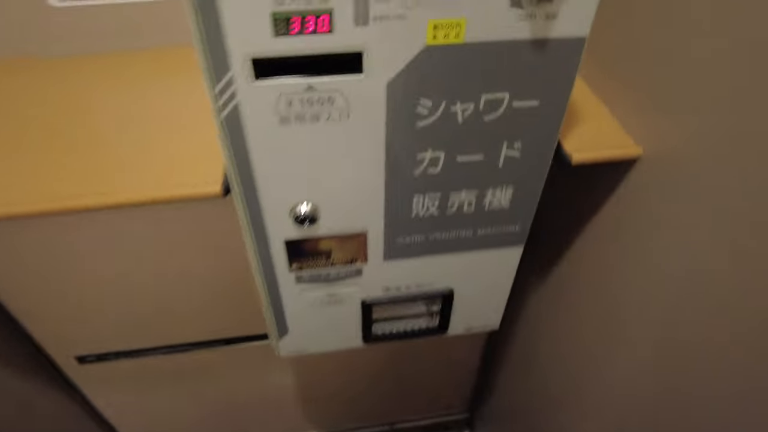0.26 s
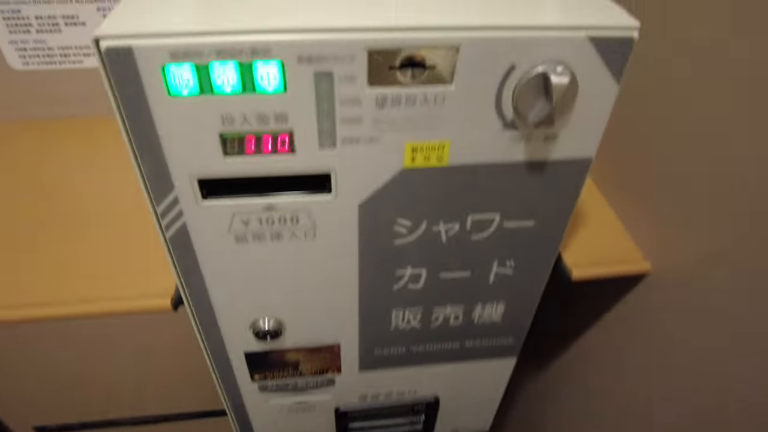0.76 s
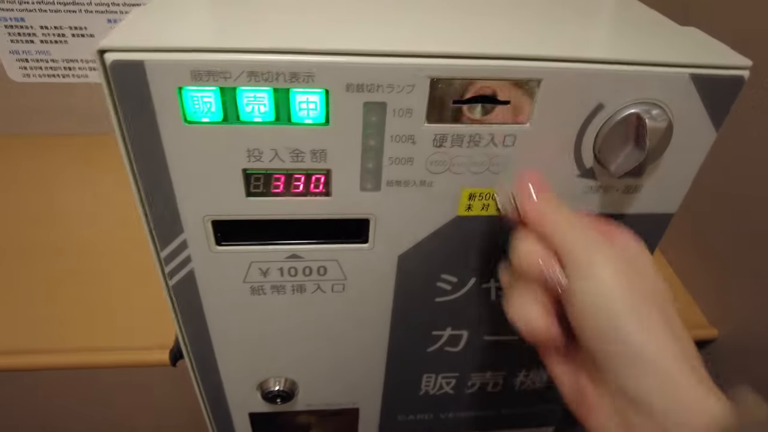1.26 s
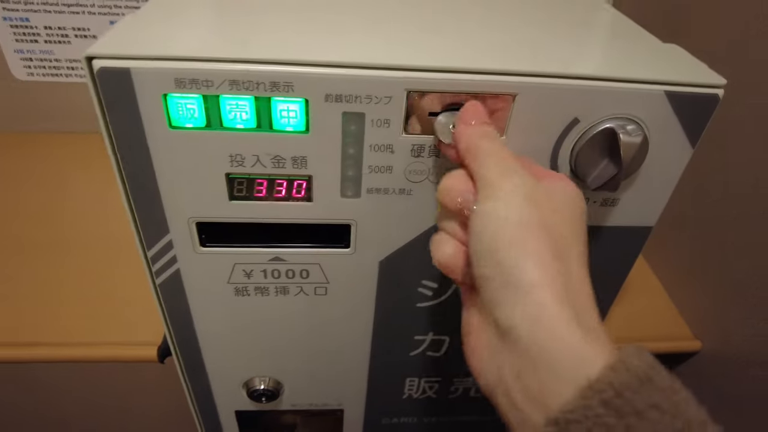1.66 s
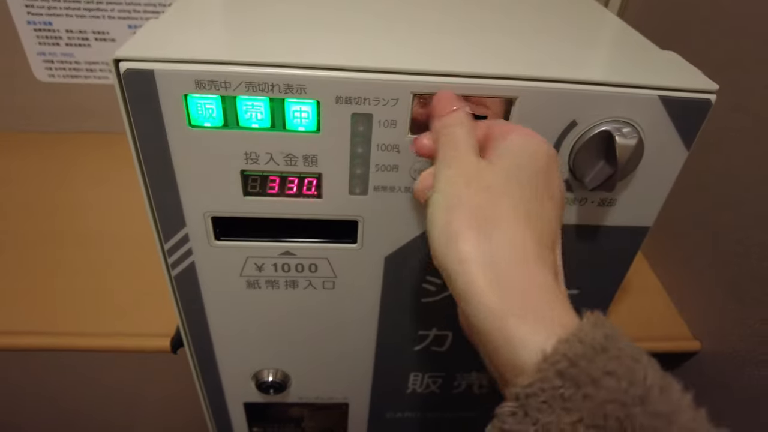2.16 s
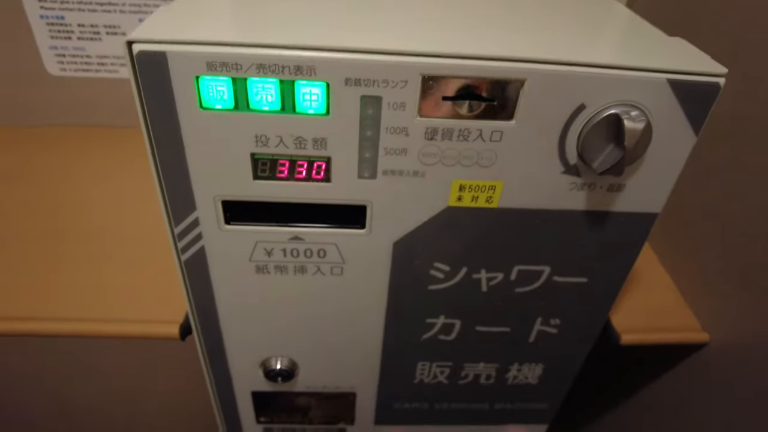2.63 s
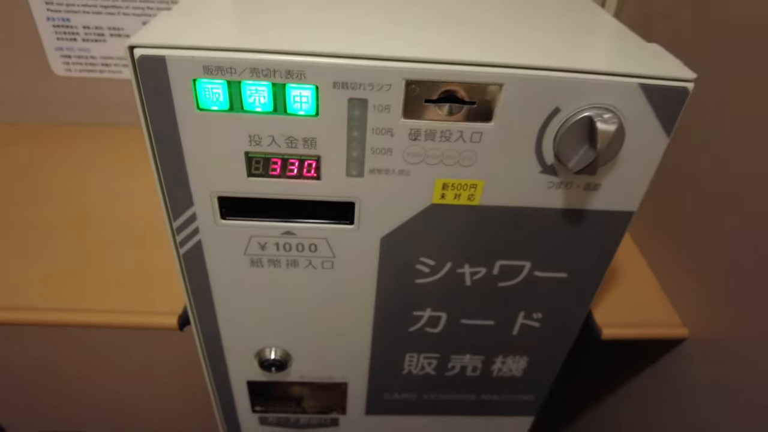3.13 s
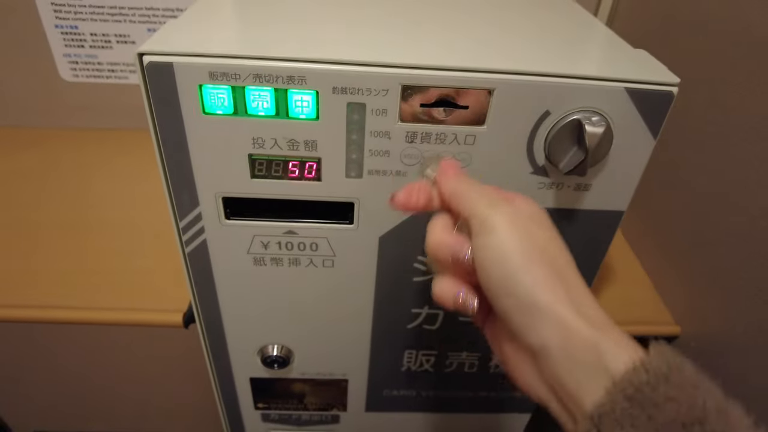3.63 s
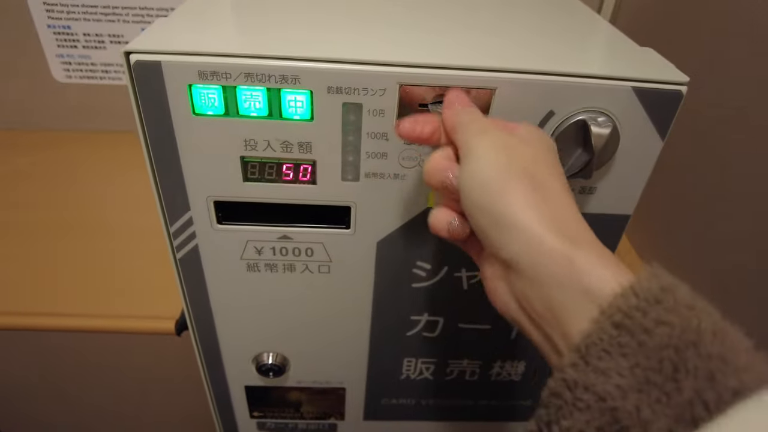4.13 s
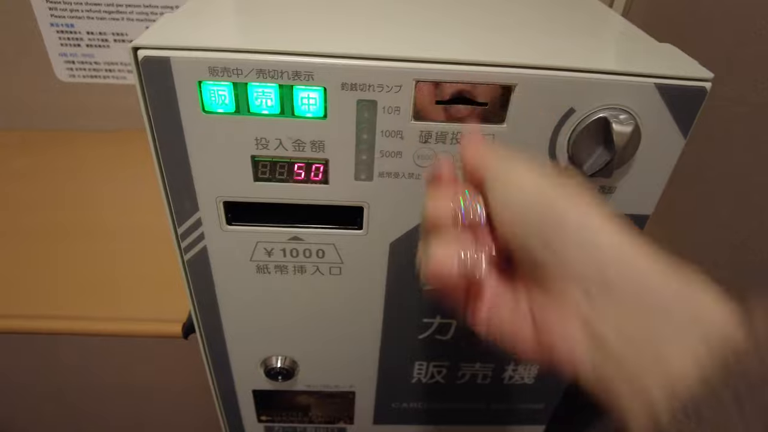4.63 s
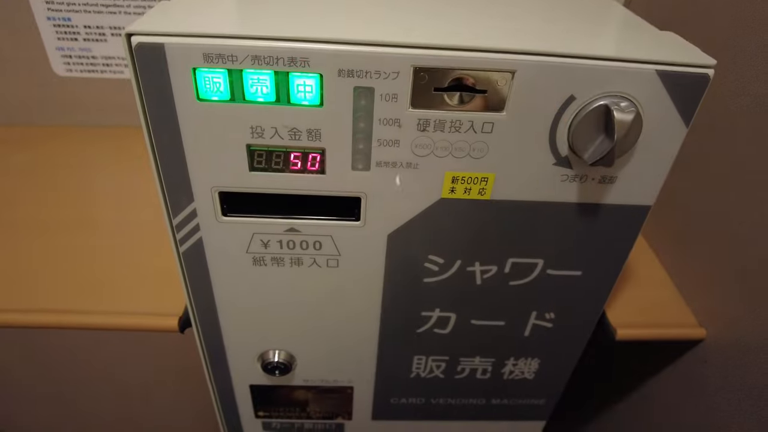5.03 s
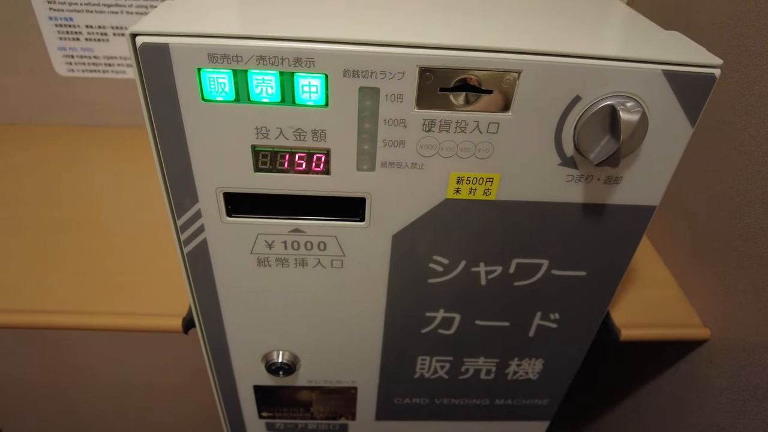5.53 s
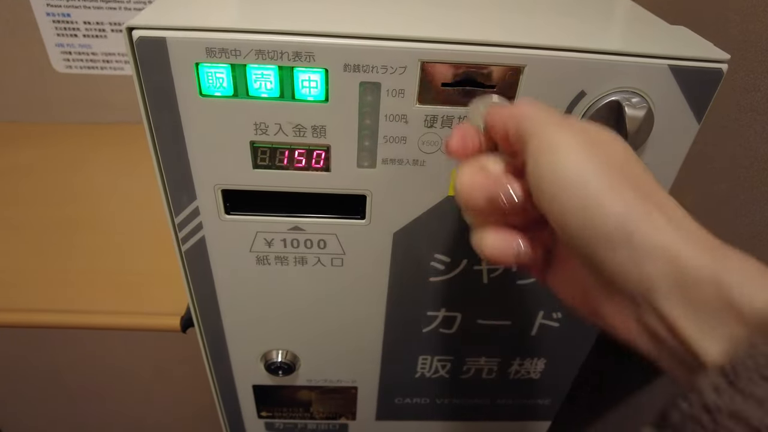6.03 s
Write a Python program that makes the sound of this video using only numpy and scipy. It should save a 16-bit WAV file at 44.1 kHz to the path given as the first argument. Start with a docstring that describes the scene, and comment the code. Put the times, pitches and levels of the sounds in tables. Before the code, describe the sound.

Inside a moving train, a deep rumble with soft roar and faint hiss runs throughout, with dull knocks early on. Close to the microphone, a coin taps a slot, clinks down a steel chute and tumbles away in rattles. A second coin follows the same way, then fabric rustles and a last light tap ends it.

```python
"""Two coins are fed into a card machine in the corridor of a moving train, close to the microphone.
They tap the slot, strike a steel chute and tumble: noise bursts with clanks and decaying metal modes.
Under them the carriage rumbles, roars and hisses as shaped noise and knocks with low dying tones.
Late on a sleeve rustles in grainy noise strokes; a short corridor tail follows the coins."""
import sys
import numpy as np
from scipy import signal
from scipy.fft import rfft, irfft
from scipy.io import wavfile
from scipy.ndimage import uniform_filter1d

SR = 44100
rng = np.random.default_rng(int(sys.argv[2]) if len(sys.argv) > 2 else 0)


def inscribe(sig):
    """Save sig as 16-bit PCM at rate SR to the path in sys.argv[1].

    A 1-D sig is mono; a 2-D sig holds one channel per row.
    Samples are clipped to [-1, 1] before scaling.
    """
    pcm = np.round(np.clip(np.atleast_2d(sig).T, -1, 1) * 32767)
    wavfile.write(sys.argv[1], SR, pcm.astype(np.int16))


N = 277389  # samples


def amp(db):
    """Amplitude factor of a level in dB."""
    return 10 ** (np.asarray(db) / 20)


def evened(x):
    """Scales to unit RMS."""
    return x / np.sqrt(np.mean(x ** 2) + 1e-20)


def read(points, hz):
    """Reads a (hz, value) curve, straight on a log-frequency axis."""
    point_hz, value = np.transpose(points)
    return np.interp(np.log(hz + 1), np.log(point_hz + 1), value)


def add(mix, start_s, sound):
    """Adds a sound at its start time, cut at the end of the mix."""
    part = mix[:, round(start_s * SR):][:, :sound.shape[-1]]
    part += sound[..., :part.shape[-1]]


def coloured(x, points):
    """Shapes sound by a (hz, gain_db) spectrum."""
    n = x.shape[-1]
    return irfft(rfft(x) * amp(read(points, np.fft.rfftfreq(n, 1 / SR))), n)


def ring(hz, t60_s, rise_s=0.00017):
    """One mode: an exponentially dying sine with a soft start."""
    t = np.arange(SR // 2) / SR
    decay = amp(-60 * t / max(t60_s, .01))
    rise = -np.expm1(-t / max(rise_s, 1e-4))
    return decay * rise * np.sin(2 * np.pi * hz * t)


# panel resonances: pitch_hz, width_hz, boost_db (mean)
PANEL_MODES = [(165.8, 12, 6.5), (322, 48, 5), (390.3, 25.7, 7), (494, 10.5, 7.5), (780, 13.3, 8),
               (1342, 69, 6.5), (2570, 75, 7.5), (4370, 230, 9)]
# left-right likeness: pitch_hz, correlation (0..1)
LIKENESS = [(30, 0.99), (80, 0.98), (180, 0.98), (500, 0.33), (1300, 0.37), (4000, 0.1), (15000, 0.067)]
# stereo balance: pitch_hz, left_minus_right_db
BALANCE = [(30, -2.5), (70, -0.1), (200, 0), (550, 3), (1600, 1.5), (5000, 0.5), (14000, 1)]


def wash(spectrum, patchy_db, size):
    """Stereo noise from random short-time spectra, with drifting patches and panel resonances."""
    hop = size // 4
    hz = np.fft.rfftfreq(size, 1 / SR)
    frames = N // hop + 6
    a, b, c, d, patches = rng.standard_normal((frames, len(hz), 5)).T
    patches = uniform_filter1d(patches, size=6, axis=0)  # over frequency
    patches = evened(uniform_filter1d(patches, size=8, axis=1))  # over time
    # each panel comes and goes
    shake = rng.standard_normal((frames, len(PANEL_MODES)))
    shake = uniform_filter1d(shake, size=SR // 4 // hop, axis=0).T
    panels_db = 0
    for (panel_hz, width_hz, boost_db), drift in zip(PANEL_MODES, shake):
        bump_db = boost_db / (1 + (2 * (hz - panel_hz) / width_hz) ** 2)
        panels_db = panels_db + np.outer(bump_db, 1 + .5 * evened(drift))
    same = np.clip(read(LIKENESS, hz), -1, 1)[:, None]
    left = a + 1j * b
    right = same * left + np.sqrt(1 - same ** 2) * (c + 1j * d)
    lean_db = np.array([.5, -.5])[:, None] * read(BALANCE, hz)
    level_db = (read(spectrum, hz) + lean_db)[..., None] + panels_db + patchy_db * patches
    spectra = np.array([left, right]) * amp(level_db)
    return evened(signal.istft(spectra, nperseg=size, noverlap=size - hop)[1][:, :N])


# running noise: time_s, rumble_db, roar_db, hiss_db
RIDE_LEVELS = [(0.0, -31, -44.5, -58.5), (2.0, -25.5, -43, -59), (2.38, -27, -44, -55),
               (4.08, -27.5, -44, -58.5), (5.57, -27, -43.5, -52.5), (6.29, -28.5, -44.5, -58)]
# body rumble: pitch_hz, density_db_per_hz (relative)
RUMBLE_SPECTRUM = [(12, -9.5), (22, 2), (36, 5), (50, 2), (88, -0.5), (118, -4.5), (146, -31), (178, -20.5),
                   (220, -24), (290, -39), (480, -120)]
# wheel roar: pitch_hz, density_db_per_hz (relative)
ROAR_SPECTRUM = [(76, -67), (130, -5), (252, -9.5), (495, -13.5), (584, -19), (776, -18), (995, -34),
                 (1320, -29), (2200, -34.5), (2860, -97)]
# air hiss: pitch_hz, density_db_per_hz (relative)
HISS_SPECTRUM = [(710, -19), (1200, -7.5), (2340, -17.5), (2780, -14), (4200, -22.5), (15500, -33.5),
                 (16400, -41)]
# dull carriage knocks: start_s, level_db, pitch_hz, t60_s
KNOCKS = [(0.391, -21, 202, 0.073), (0.528, -17.5, 180.2, 0.24), (1.11, -12.5, 223, 0.041),
          (1.505, -32, 151, 0.054), (1.943, -28.5, 182.6, 0.25), (2.298, -26, 317, 0.077),
          (5.582, -27.5, 685, 0.08), (5.82, -22.5, 267, 0.06)]


def carriage():
    """Rumble, roar and hiss, each swelling with the ride, and knocks as low dying modes."""
    time_s, *levels = np.transpose(RIDE_LEVELS)
    t = np.arange(N) / SR
    rumble, roar, hiss = (amp(np.interp(t, time_s, level_db)) for level_db in levels)
    out = rumble * wash(RUMBLE_SPECTRUM, 1.0, size=8192)
    out += roar * wash(ROAR_SPECTRUM, 1.0, size=4096)
    out += hiss * wash(HISS_SPECTRUM, 1.0, size=1024)
    for start_s, level_db, pitch_hz, t60_s in KNOCKS:
        add(out, start_s, amp(level_db) * ring(pitch_hz, t60_s, 0.0073)[None])
    return out


ENDS_DB, BODY_SHARE = -8.5, 0.47  # body and treble sit below the middle; brightness trades them
CLANK_PER_BRIGHT = -0.2  # dB per dB: dull blows clank harder
CLANK_FALL_DB = 165  # per decay_s
# sheet-metal modes: pitch_hz, level_db (relative), t60_s
CABINET_MODES = [(1200, -10, .04), (1900, -4, .06), (2795, -6, .07), (3700, -12, .05), (4370, -7, .05),
                 (4730, -10, .05), (5700, -11, .04), (6750, 3, .035), (7800, -9, .04)]


def tap(level_db, bright_db, clank_hz, decay_s, ring_db,
        clank_db, half_width_share, note, rise_s, uneven_db):
    """A noise rattle, the cabinet's modes and one clank; slow rise and uneven level make a tumble."""
    t = np.arange(SR // 4) / SR
    hz = np.fft.rfftfreq(len(t), 1 / SR)
    shared, wobble, *own = rng.standard_normal((4, len(t)))
    low_db = ENDS_DB - BODY_SHARE * bright_db
    high_db = ENDS_DB + (1 - BODY_SHARE) * bright_db
    colour = [(400, low_db + 0.5), (900, low_db), (2000, low_db), (3500, -5.0),
              (7000, -2.5 + 0.45 * high_db), (10000, high_db), (16000, high_db - 1.5)]

    # many small parts ring unevenly; the rattle keeps feeding the modes
    lumps_db = 1.5 * evened(uniform_filter1d(rng.standard_normal(len(hz)), size=110))
    peaks = sum(amp(ring_db + mode_db - 4) / (1 + ((hz - mode_hz) / (0.029 * mode_hz)) ** 2)
                for mode_hz, mode_db, _ in CABINET_MODES)
    body_db = 20 * np.log10(1 + peaks)
    source = 0.4 * shared + 1.28 * np.array(own)
    rattle = evened(irfft(rfft(source) * amp(read(colour, hz) + lumps_db + body_db), len(t)))
    u = t / max(decay_s, .01)
    fall = amp(-30 * u - 14 * u ** 2) + np.exp(-t / 0.0024)  # slow-then-steep fall plus a sharp onset
    fall *= amp(uneven_db * evened(uniform_filter1d(wobble, size=70)))

    # one clean contact leaves a note in the noise
    band = 1 / (1 + ((hz - clank_hz) / (half_width_share * clank_hz)) ** 2)
    clank = evened(irfft(rfft(shared) * band, len(t)))
    clank = 0.7 * (clank + note * np.sin(2 * np.pi * clank_hz * t))
    clank_gain = amp(clank_db + CLANK_PER_BRIGHT * bright_db - CLANK_FALL_DB * u)

    # each hit wakes the modes differently; loose panels make them rough
    spots_db = rng.normal(0, 2, (len(CABINET_MODES), 2, 1))
    chatter = uniform_filter1d(rng.standard_normal((len(CABINET_MODES), 2, len(t))), size=200)
    modes = np.zeros((2, len(t)))
    for (mode_hz, mode_db, t60_s), spot_db, rough in zip(CABINET_MODES, spots_db, chatter):
        gain = amp(mode_db + read(colour, mode_hz) + spot_db) * (1 + .5 * evened(rough))
        modes += gain * ring(mode_hz, t60_s)[:len(t)]

    sound = rattle * fall + clank_gain * clank + amp(ring_db) * modes
    return amp(level_db) * sound * -np.expm1(-t / max(rise_s, 1e-4))


# settings: clank_db, half_width_share (of clank_hz), note (strength), rise_s, uneven_db
TAP_SETTINGS = (1, 0.06, 1.1, 0.00054, 1)
TUMBLE_SETTINGS = (4.5, 0.05, 0.4, 0.0049, 3)
TUMBLE_RING_DB = -35
# slot and chute contacts: start_s, level_db, bright_db (treble minus body), clank_hz, decay_s, ring_db
CONTACTS = [(0.296, -39.5, -17.5, 850, 0.048, -10), (0.346, -62, 7, 11000, 0.077, -9),
            (0.3998, -57, -21, 3050, 0.27, -21), (0.949, -48, -27, 1340, 0.053, -18),
            (1.3917, -34, -26, 1130, 0.03, -16), (1.409, -59, -52, 1880, 0.2, -10),
            (1.6575, -39.5, 7, 2550, 0.033, 2), (1.71, -57, -17, 2670, 0.095, -5),
            (1.771, -60, -17, 6900, 0.093, -9), (2.017, -49.5, -2, 5100, 0.12, -6),
            (2.095, -51.5, -2, 6800, 0.1, 5), (2.177, -47, 15, 11200, 0.099, -10),
            (2.278, -48.5, -17, 6940, 0.038, -8), (2.3218, -42.5, 5, 8500, 0.07, -21),
            (2.4686, -38.5, -13, 2520, 0.033, -9), (2.487, -43, 2, 3900, 0.04, -10),
            (2.541, -36.5, -5, 6400, 0.043, -15), (2.587, -52, -3, 4560, 0.21, -8),
            (2.6279, -35.5, 9, 4760, 0.035, -14), (2.929, -43, 7, 5650, 0.018, -17),
            (3.014, -53, -14, 4300, 0.049, -12), (3.067, -44, -4, 4100, 0.037, -16),
            (3.9801, -38, 4, 1960, 0.077, 6), (4.0043, -46.5, -10, 1970, 0.066, 10.5),
            (4.1136, -47.5, -6, 1960, 0.058, 9), (4.297, -54, 7, 9000, 0.046, -2),
            (4.3106, -46.5, 10, 4440, 0.041, -12), (4.358, -52.5, 13, 12100, 0.039, -10),
            (4.464, -39.5, 0.5, 8500, 0.1, -5), (4.4962, -44, -1, 6770, 0.15, -17),
            (4.567, -47, -12, 3930, 0.059, -14), (4.678, -43.5, -16, 2490, 0.071, -15),
            (4.6966, -39.5, 1, 4260, 0.047, -6.5), (4.8017, -38.5, 9, 4800, 0.04, -7),
            (4.967, -50.5, -3, 5540, 0.054, -3), (5.1033, -45.5, -22, 4120, 0.08, -10),
            (5.111, -48.5, -9, 1936, 0.22, -14), (5.414, -49.5, -29, 1170, 0.16, -11),
            (5.475, -40, -15, 4400, 0.1, -25), (5.489, -36.5, -3, 1160, 0.024, -18),
            (5.771, -46, -33, 750, 0.068, -19), (6.2397, -42.5, -4, 1870, 0.069, -26)]
# sliding, tumbling coin, soft-starting rattles: start_s, level_db, bright_db, clank_hz, decay_s
TUMBLE_RATTLES = [(0.7526, -46.5, -5, 14200, 0.11), (2.344, -43, 1, 3980, 0.097),
                  (2.7286, -47.5, 10, 7300, 0.19), (2.946, -42, 2, 5540, 0.16),
                  (2.9802, -42.5, -11.5, 4400, 0.19), (3.052, -47, -5, 4200, 0.19),
                  (3.108, -42.5, -13.5, 4300, 0.16), (3.124, -44, -49, 980, 0.082),
                  (3.1998, -50, -6, 7250, 0.24), (3.2385, -51, -23, 4000, 0.17),
                  (3.419, -45.5, -15.5, 11700, 0.15), (3.4528, -40.5, -4, 4200, 0.06),
                  (4.757, -42.5, -9, 4180, 0.13), (5.011, -61, -6, 5600, 0.57),
                  (5.054, -39.5, -2.5, 4230, 0.098), (5.071, -38.5, 4, 4230, 0.043),
                  (5.1482, -39.5, -5, 4380, 0.095), (5.167, -46, -39, 1100, 0.087)]


def coins():
    """Coins on metal: sharp contacts, and slower, softer-starting rattles with uneven level."""
    out = np.zeros((2, N))
    for start_s, *blow in CONTACTS:
        add(out, start_s, tap(*blow, *TAP_SETTINGS))
    for start_s, *rattle in TUMBLE_RATTLES:
        add(out, start_s, tap(*rattle, TUMBLE_RING_DB, *TUMBLE_SETTINGS))
    return out


def corridor(x):
    """A short, narrow space: a decaying tail, different at each ear, duller as it dies."""
    t = np.arange(SR // 2) / SR
    noise = rng.standard_normal((2, len(t))) * (t > .004)
    dull = signal.lfilter([.4], [1, -.6], noise)
    tail = noise * amp(-60 * t / 0.038) + dull * amp(-11.5 - 60 * t / 0.4)
    return signal.fftconvolve(x, tail / np.linalg.norm(tail[0]), axes=1)[:, :N]


def flutter(depth_db):
    """Random gain wavering, mostly deep dips with slight rises, as the rolling coin chokes the rings."""
    drift = uniform_filter1d(rng.standard_normal(N), size=220)
    drift = evened(uniform_filter1d(drift, size=220))
    return amp(depth_db * (1 - drift ** 2) / 2)


# steel plate modes: pitch_hz (first row replaced by low_hz), level_db (relative), t60_s
CHUTE_MODES = [(3022, 0, .2), (3183, -8, .12), (3940, -9, .08), (4825, -3, .04), (4865, -17, .36),
               (9420, -6, .05)]
# blows on the chute: start_s, level_db, low_hz, pair_db (extra, near 4.8 kHz), top_db (extra, top mode)
BLOWS = [(2.3224, -37.5, 2998, -4, 9.5), (2.341, -45, 2998, 4, -12), (2.3575, -40, 2998, 8, -1),
         (2.383, -48, 2998, 7, -10), (2.412, -52, 2998, 11, -10), (4.465, -39, 3025, 2, -6),
         (4.566, -50, 3025, 12, -6)]
# coin ringing in the air: start_s, level_db, pitch_hz
COIN_RINGS = [(2.2797, -58, 11600), (2.5421, -46, 11600), (4.4662, -44, 10500), (4.7331, -52, 11000)]


def rings():
    """Chute modes, each wavering on its own, and the coin; each coin loads the lowest mode differently."""
    plate, coin = np.zeros((len(CHUTE_MODES), N)), np.zeros((1, N))
    for start_s, level_db, low_hz, pair_db, top_db in BLOWS:
        modes = [(low_hz, *CHUTE_MODES[0][1:]), *CHUTE_MODES[1:]]
        blow = []
        for hz, mode_db, t60_s in modes:
            extra_db = pair_db * (4500 < hz < 5200) + top_db * (hz > 8000)
            blow.append(amp(level_db + mode_db + extra_db) * ring(hz, t60_s, 0.00035))
        add(plate, start_s, np.array(blow))
    for start_s, level_db, pitch_hz in COIN_RINGS:
        add(coin, start_s, amp(level_db) * ring(pitch_hz, 0.13)[None])
    return sum(mode * flutter(6.5) for mode in plate) + coin * flutter(6)


RUB_TREBLE_DB, RUB_TREBLE_DB_PER_S = -14.5, 17.5  # longer strokes swish brighter
# sleeve strokes: start_s, level_db, length_s
STROKES = [(5.28, -45, 0.16), (5.389, -43.5, 0.09), (5.561, -38, 0.2), (5.649, -38.5, 0.11),
           (5.816, -35, 0.14), (5.899, -50.5, 0.33)]


def sleeve():
    """Fleece rubbing near the microphone: grainy strokes with a dull body and a bright edge."""
    body_colour = [(120, -5), (280, 7.0), (480, 6.0), (700, 1.0), (1300, -3), (3000, -16.5), (5000, -75)]
    edge_colour = [(2000, -42), (3500, 2.0), (8000, -3), (16000, -7.0)]
    out = np.zeros((2, N))
    for start_s, level_db, length_s in STROKES:
        u = np.arange(SR // 2) / SR / max(length_s, .02)
        left, right, grip = rng.standard_normal((3, len(u)))
        grains = np.array([left, right]) * amp(4.5 * evened(uniform_filter1d(grip, size=700)))
        body = evened(coloured(grains, body_colour))
        edge = evened(coloured(grains, edge_colour))
        edge_gain = amp(RUB_TREBLE_DB + RUB_TREBLE_DB_PER_S * length_s)
        stroke = -np.expm1(-u / 0.054) * np.exp(-3 * u ** 2)  # quick catch, then it slips away
        add(out, start_s, amp(level_db) * stroke * (body + edge_gain * edge))
    return out


def scene():
    """Sums carriage, coins, ringing metal, corridor tail and sleeve."""
    near, metal = coins(), rings()
    wet = near + amp(-5) * metal  # the ringing metal gets less corridor tail than the taps
    return near + metal + amp(-2.0) * corridor(wet) + sleeve() + carriage()


EDGE_HZ = 15900
# side channel: pitch_hz, gain_db
SIDE_GAIN = [(1000, -2), (14000, 1)]


def record(dry):
    """A mid-side pair that widens toward the treble, then a low-pass band limit."""
    mid = (dry[0] + dry[1]) / 2
    side = coloured((dry[0] - dry[1]) / 2, SIDE_GAIN)
    pair = np.array([mid + side, mid - side])
    lowpass = signal.firwin(511, EDGE_HZ, window=("kaiser", 9), fs=SR)
    return signal.oaconvolve(pair, lowpass[None], "same")


dry = scene()
out = record(dry)
inscribe(out)
```